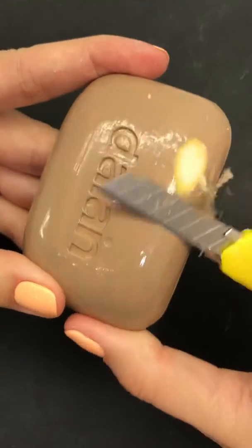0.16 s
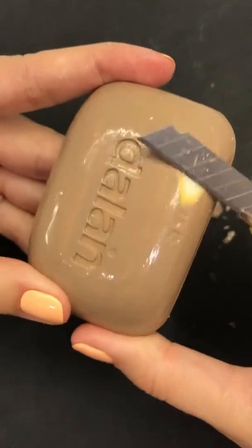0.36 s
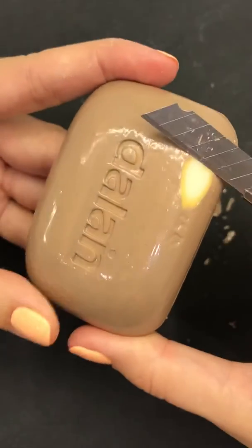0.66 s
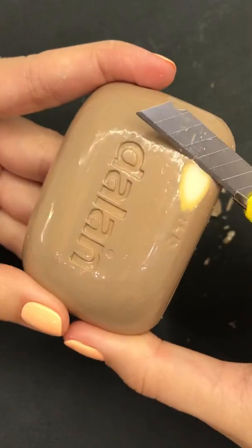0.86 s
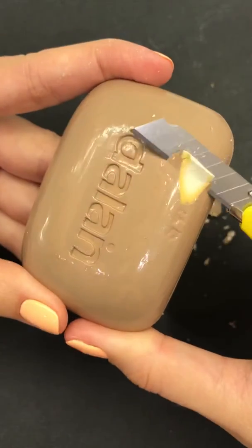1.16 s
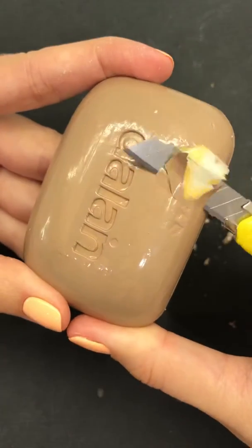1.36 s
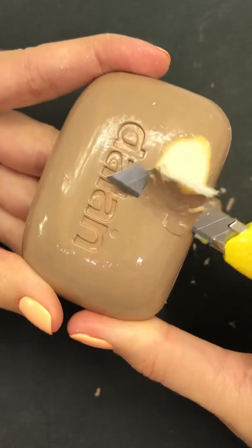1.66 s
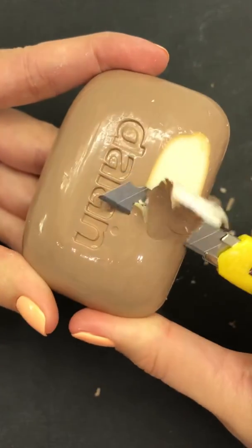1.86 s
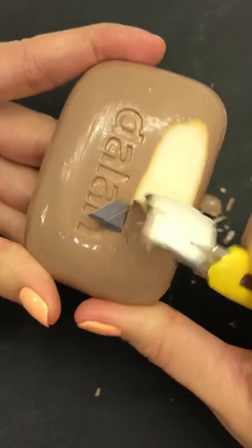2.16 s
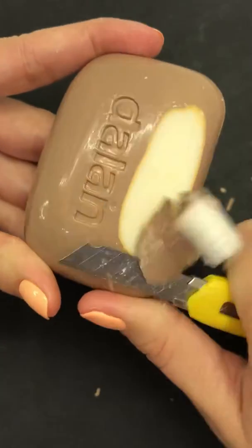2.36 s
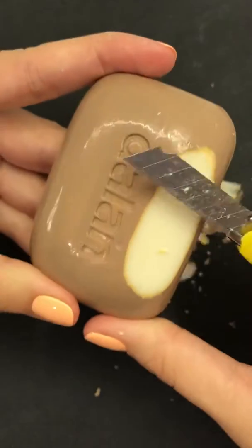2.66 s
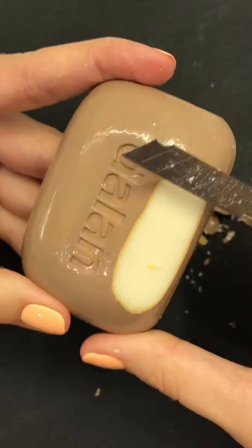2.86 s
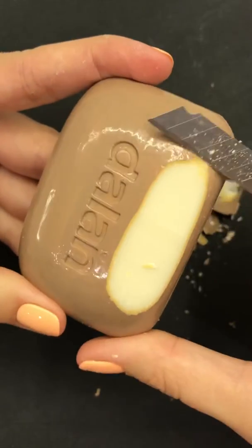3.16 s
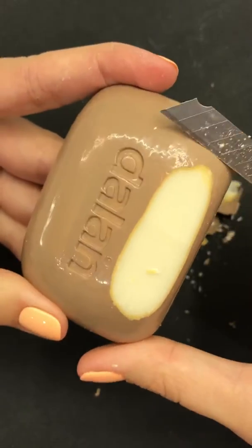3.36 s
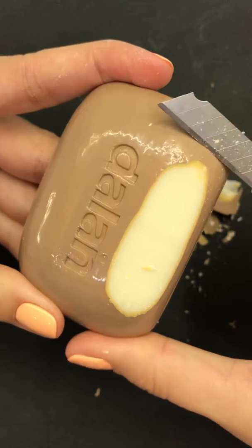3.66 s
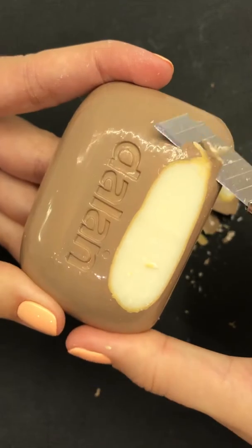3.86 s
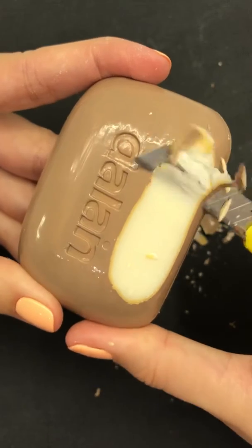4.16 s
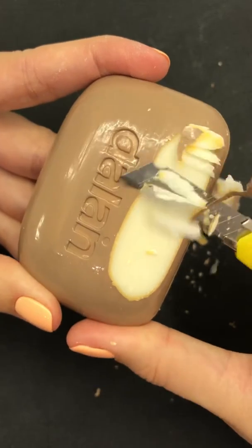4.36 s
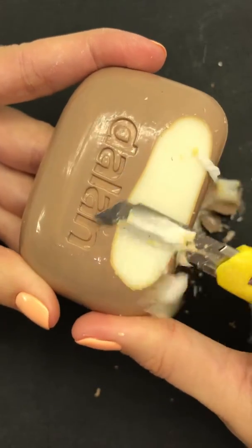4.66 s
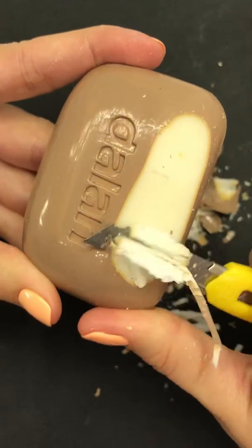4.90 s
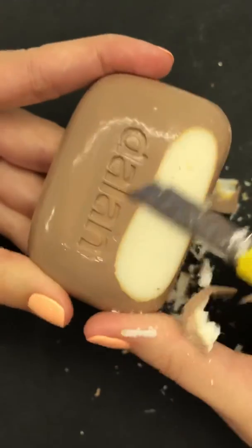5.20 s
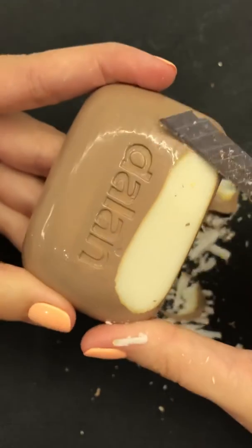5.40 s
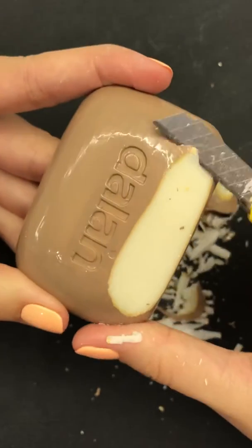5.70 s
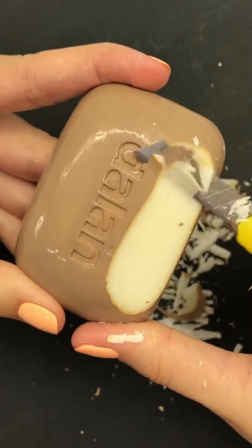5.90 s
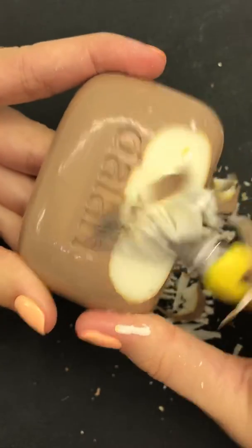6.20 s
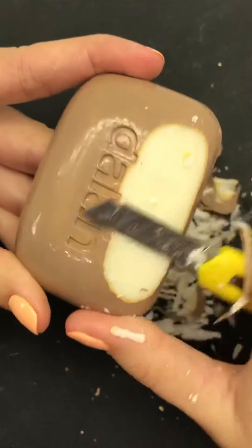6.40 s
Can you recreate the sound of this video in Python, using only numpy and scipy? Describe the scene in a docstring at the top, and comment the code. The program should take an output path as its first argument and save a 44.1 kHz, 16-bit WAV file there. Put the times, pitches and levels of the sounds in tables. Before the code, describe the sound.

Close, brittle crackling and dry scraping as a utility knife shaves coated soap in uneven strokes, with a faint steady hum behind.

```python
"""A hard, lacquered bar of soap is carved with a thin knife at a table, close to a phone's microphone.
The brittle skin snaps, the soap cracks and crumbs tick on the table, ringing bar, blade and tabletop.
Between cracks the blade scrapes through the grit, and a few soft bumps come through the table.
The room is small and answers briefly; an appliance hums in the background."""
import sys
import numpy as np
from scipy import signal
from scipy.fft import rfft, irfft, next_fast_len
from scipy.io import wavfile
from scipy.ndimage import map_coordinates

SR = 44100
rng = np.random.default_rng(int(sys.argv[2]) if len(sys.argv) > 2 else 0)


def file_out(sig):
    """Save sig as 16-bit WAV at sys.argv[1]."""
    # one column per channel
    cols = np.atleast_2d(sig).T
    # limit, then scale
    lim = np.clip(cols, -1, 1)
    pcm = np.round(lim * 32767).astype(np.int16)
    wavfile.write(sys.argv[1], SR, pcm)


N = 288414

# modes of the soap bar: f/Hz, width/Hz, level/dB
BAR_MODES = [(2734, 130, 1), (2970, 193, -1.5), (3250, 104, 3), (3595, 174, 6), (3744, 518, 1.5),
             (4177, 104, 7), (4264, 320, -0.5), (4970, 378, -0.5)]
# modes of the blade: f/Hz, width/Hz, level/dB
BLADE_MODES = [(5543, 600, 1), (5730, 413, 3.5), (6190, 640, -6.5), (6955, 500, -4), (8510, 260, -9)]
# modes of the tabletop: f/Hz, width/Hz, level/dB
TABLE_MODES = [(892, 370, -5.5), (1253, 170, 0), (1958, 160, 0), (2270, 340, -2)]
# humps of a brittle break and the blade's high modes: f/Hz, width/Hz, level/dB
SNAP_MODES = [(9600, 520, -4), (10830, 120, 0), (12800, 3000, 5.5), (12640, 360, 8.5)]


def amp(db):
    """dB to gain."""
    return 10 ** (np.asarray(db) / 20)


def unit(x):
    """x at rms 1."""
    return x / np.sqrt(np.mean(x ** 2) + 1e-20)


def along(points, hz):
    """(f/Hz, value) points interpolated on a log frequency axis."""
    f, v = np.transpose(points)
    return np.interp(np.log(hz + 1), np.log(f + 1), v)


def filtered(x, gain):
    """x times a complex gain, given as a function of frequency."""
    m = next_fast_len(N + SR // 2)
    return irfft(rfft(x, m) * gain(np.fft.rfftfreq(m, 1 / SR)), m)[..., :N]


def response(modes):
    """The summed, causal response of a set of resonances, alternating in sign."""
    return lambda f: sum((-1) ** k * amp(db) * 1j * f * width / (hz * hz - f * f + 1j * f * width)
                         for k, (hz, width, db) in enumerate(modes))


def resonate(x, modes):
    """x through a set of resonances, at rms 1."""
    return unit(filtered(x, response(modes)))


def struck(modes, lift_db):
    """Ringing after one blow, damped by the edge still in touch, each mode lifted by its own dB; peak 1."""
    damped = [(hz, 1.5 * width, db + lift) for (hz, width, db), lift in zip(modes, lift_db)]
    ring = irfft(response(damped)(np.fft.rfftfreq(2048, 1 / SR)))[:1400]
    return ring / np.abs(ring).max()


def wobble(rate):
    """A smooth random curve, rate knots a second."""
    return map_coordinates(rng.standard_normal(int(N * rate / SR) + 4), [np.arange(N) * rate / SR])


def grit(per_second, spread_db):
    """Random small breaks of scattered size, rms 1."""
    breaks = rng.random(N) < per_second / SR
    size_db = spread_db * np.minimum(rng.exponential(1, N), 4.5)
    return unit(breaks * amp(size_db) * rng.standard_normal(N))


def appliance_hum():
    """An appliance in the background: narrow bands of noise at its motor lines and the room's low modes."""
    # room resonances and motor lines: f/Hz, width/Hz, level/dB
    hum_modes = [(47.4, 15, -21.5), (63.3, 4, -18.5), (82.5, 25, -22), (98.5, 4.1, -11), (126.9, 6.7, -0.5),
                 (154.57, 3.12, 2), (167.7, 7, -7.5), (189.2, 8.2, -8.5), (201, 14, -15.5),
                 (230.1, 2.9, -9.5), (242.3, 7.3, -16), (255, 2.57, -7.5), (265.2, 5, -15.5),
                 (298, 16, -19.5), (318.6, 5.5, -15.5), (346.3, 1.8, -9), (363.4, 15, -27),
                 (411, 37, -24.5), (436, 18, -25)]
    hum = resonate(rng.standard_normal(N), hum_modes)
    return amp(-45.5) * filtered(hum, lambda hz: 1 / (1 + (hz / 450) ** 6))


def room_tone():
    """The faint, steady noise of the room's air."""
    # spectrum of the room noise: f/Hz, relative density/dB
    air_spectrum = [(260, -13.5), (450, 0), (507, -6), (947, -8), (2150, -16.5), (3360, -15), (3780, -23),
                    (4390, -15), (4870, -24.5), (6970, -23), (10400, -28.5), (14900, -25), (15800, -35.5)]
    return amp(-66.5) * unit(filtered(rng.standard_normal(N), lambda hz: amp(along(air_spectrum, hz))))


def room_echo(x):
    """A scattered echo off table and hands, then the small room's tail; drawn anew every tenth second."""
    # decay of the room: f/Hz, T60/s
    decay_times = [(800, 0.43), (3300, 0.41), (8000, 0.45), (15000, 0.39)]
    out = np.zeros(N + SR)
    hop, delay = SR // 10, 190  # samples
    for start in range(0, N, hop):
        hz, t, noise = signal.stft(rng.standard_normal(SR // 2), SR, nperseg=256)
        decay = amp(-60 * t / along(decay_times, hz)[:, None])
        tail = signal.istft(noise * decay, SR, nperseg=256)[1]
        near = rng.standard_normal(len(tail)) * np.exp(-np.arange(len(tail)) / SR / 0.00057)
        answer = amp(-19.0) * tail / np.linalg.norm(tail) + amp(-9.5) * near / np.linalg.norm(near)
        wet = signal.fftconvolve(x[start:start + hop], answer)
        out[start + delay:][:len(wet)] += wet
    return out[:N]


def table_bumps():
    """Low thuds reach the microphone through the table, each a soft swell of a few cycles."""
    # bumps: t/s, envelope peak/dB, f/Hz
    bumps = [(.17, -52.5, 45), (1.82, -52, 60), (2.39, -48.5, 49.6), (4.752, -50, 61.7), (5.1, -52, 44.8),
             (6.273, -47, 61)]
    t = np.arange(N) / SR
    return sum(amp(db) * np.exp(-((t - s) / 0.039) ** 2) * np.sin(2 * np.pi * hz * (t - s))
               for s, db, hz in bumps)


def blade_scrape():
    """The edge ploughs grit in clumps: coarse grains ring bar, blade and table, finer ones hiss."""
    # scrape of the blade in the soap: t/s, level/dB
    stroke = [(0.059, -77), (0.084, -48), (0.144, -46), (0.214, -67.5), (0.403, -51.5), (0.555, -66),
              (0.57, -75), (0.693, -94.5), (0.949, -91.5), (0.984, -75), (1.279, -68.5), (1.369, -90),
              (1.398, -64), (1.811, -63), (2.163, -68), (2.35, -65.5), (2.546, -53), (2.764, -61.5),
              (2.883, -67.5), (3.03, -92.5), (3.058, -66.5), (3.312, -71.5), (3.411, -85), (3.812, -84.5),
              (3.839, -61), (3.979, -66.5), (4.213, -59.5), (4.295, -61), (4.32, -73), (4.45, -69),
              (4.515, -58.5), (4.628, -65.5), (4.868, -55.5), (4.997, -63.5), (5.066, -51.5),
              (5.161, -62.5), (5.2, -41), (5.264, -49.5), (5.365, -40.5), (5.405, -52.5), (5.53, -60),
              (5.638, -93), (5.679, -56), (5.72, -63.5), (6.05, -60.5), (6.171, -57), (6.239, -42),
              (6.31, -60.5), (6.416, -46.5), (6.539, -53.5)]
    # brightness of the scrape: t/s, hiss lift/dB
    brightness = [(0.3, 1.5), (0.9, 2), (1.2, 2), (2.2, 5), (2.6, 0), (3.1, -3), (4.0, 4.5), (4.4, 1),
                  (4.9, 1), (5.1, 5.5), (5.45, -2.5), (6.1, 3.5), (6.5, -2)]
    t = np.arange(N) / SR
    scrape_db = np.interp(t, *np.transpose(stroke))
    # a louder scrape hisses more and comes in deeper clumps
    hiss_db = -63.5 + 0.83 * (scrape_db + 57.5) + np.interp(t, *np.transpose(brightness))
    clump_db = np.clip(2 + 0.071 * (scrape_db + 57), 0, 4)
    clumps = amp(clump_db * (wobble(60) + wobble(150)))
    coarse = clumps * grit(per_second=2500, spread_db=1.0)
    fine = clumps * grit(per_second=6000, spread_db=2.5)
    body = unit(resonate(coarse, BAR_MODES)
                + amp(-5.0) * resonate(coarse, BLADE_MODES)
                + amp(-10.5) * resonate(coarse, TABLE_MODES))
    hiss = filtered(resonate(fine, SNAP_MODES), lambda hz: 1 / (1 + (hz / 15000) ** 4))
    return amp(scrape_db) * body + amp(hiss_db) * hiss


def soap_cracks():
    """Each crack is a sharp break in a spray of crumbs, driving four voices: bar, blade, snap and table."""
    # cracks and ticks: t/s, ring centre/Hz, bar peak/dB, snap peak/dB, table peak/dB, crumbs re break/dB
    cracks = [(0.0694, 2480, -16.5, -20, -33, -11), (0.089, 3340, -30, -38, -56, -15.5),
              (0.1065, 3200, -43, -35, -52, -18.5), (0.1189, 4030, -34, -28, -56, -24),
              (0.1284, 3180, -36, -50.5, -45, 2), (0.1419, 2900, -26, -44, -48, -0.5),
              (0.1516, 2800, -18.5, -32.5, -37, -11.5), (0.2452, 4290, -40, -38, -61, -23),
              (0.2968, 3460, -29.5, -38, -57, -16), (0.3058, 3230, -36, -44.5, -63, -20),
              (0.3338, 4120, -38, -57, -66, -17.5), (0.3446, 3130, -25, -31.5, -56, -19),
              (0.359, 3270, -42.5, -64.5, -63, -20), (0.3734, 3120, -52, -49.5, -65, -26),
              (0.3852, 3320, -8, -30.5, -37, -22), (0.4152, 3350, -30.5, -34, -61, -23.5),
              (0.598, 3260, -66, -59, -68, -18), (0.7006, 4370, -60.5, -50, -66, -22),
              (0.753, 3220, -59, -53, -70, -19), (0.8473, 3070, -48.5, -57.5, -70, -12),
              (0.9622, 3140, -27.5, -37.5, -42, -12.5), (0.9962, 4340, -38, -43, -58, -8.5),
              (1.0748, 3330, -43.5, -39, -66, -21.5), (1.0975, 3260, -60, -55.5, -68, -8),
              (1.129, 4660, -40.5, -41, -64, -18), (1.1479, 3260, -56, -56, -68, -13),
              (1.1688, 2690, -62, -45.5, -67, -28), (1.2003, 2710, -44.5, -49, -65, -13),
              (1.272, 5120, -61, -40.5, -70, -24), (1.2813, 4460, -46.5, -34, -68, -29),
              (1.3308, 3220, -58, -45, -71, -32), (1.3777, 4230, -35, -18, -56, -24),
              (1.405, 3310, -48, -24, -65, -31.5), (1.4345, 3310, -48, -38, -67, -21),
              (1.4872, 4530, -47, -17, -62, -33), (1.4956, 3230, -43, -34, -62, -23.5),
              (1.5089, 3250, -57, -35, -62, -32), (1.5528, 4220, -43, -17.5, -64, -33),
              (1.5743, 4400, -45, -31.5, -64, -21), (1.592, 3030, -33, -51, -37, -18.5),
              (1.6036, 3260, -42, -52, -53, -7), (1.6376, 4430, -50, -24, -66, -36),
              (1.6642, 4500, -49, -25.5, -64, -28), (1.7395, 5300, -45, -22, -65, -32.5),
              (1.7787, 3980, -36, -28.5, -54, -16), (1.8121, 3260, -55, -34.5, -66, -15),
              (1.8261, 4100, -51, -36, -59, -27), (1.9136, 4090, -57, -42, -59, -20.5),
              (1.996, 4640, -46, -39.5, -59, -6), (2.0446, 4230, -57, -22, -64, -31),
              (2.0626, 4660, -60, -31, -68, -30), (2.1124, 3390, -61, -39.5, -64, -24),
              (2.1412, 3270, -57, -37, -69, -25), (2.168, 4600, -55, -29, -66, -29.5),
              (2.2435, 4000, -40, -12, -50, -29.5), (2.276, 4570, -43, -54, -54, -5),
              (2.3084, 4460, -44.5, -28, -67, -22.5), (2.3606, 3980, -23.5, -21.5, -36, -16.5),
              (2.37, 2920, -30.5, -58, -41.5, -13), (2.3928, 5000, -32, -33.5, -46, -26),
              (2.4929, 2730, -30.5, -26.5, -46, -19.5), (2.5176, 3290, -37, -33.5, -56, -20.5),
              (2.545, 4110, -30.5, -24.5, -47, -11.5), (2.5547, 3560, -36, -36.5, -55, -25),
              (2.5808, 3470, -15.5, -30, -47, -18.5), (2.6005, 3400, -17.5, -25, -34, -18),
              (2.6287, 3610, -34, -56, -51, -20), (2.68, 3380, -43, -45, -54, -8),
              (2.731, 3510, -40, -53, -65, -19.5), (2.7427, 3800, -38, -49, -63, -25),
              (2.7798, 3350, -17, -33.5, -38.5, -13), (3.0432, 4460, -32, -35.5, -58, -8.5),
              (3.055, 4290, -36, -33, -44, -10.5), (3.154, 4400, -40.5, -38, -60, -13.5),
              (3.1879, 3970, -37, -38.5, -51, -10), (3.228, 3100, -51.5, -61, -56, -9),
              (3.3087, 3210, -55, -57, -69, -6), (3.8153, 3210, -47, -41, -68, -21),
              (3.828, 2980, -14, -23, -34, -12.5), (3.8669, 3100, -37, -51, -47, -8),
              (3.904, 2790, -44, -25.5, -67, -31), (4.024, 3300, -54, -50, -64, -15),
              (4.171, 3160, -44, -64, -60, -9), (4.3314, 3170, -49.5, -53, -69, -12),
              (4.381, 3170, -46, -67, -69, -18), (4.3963, 3340, -37, -51, -65, -19),
              (4.4213, 3260, -50.5, -50, -70, -5), (4.4594, 3350, -43, -57, -64, -15),
              (4.4992, 3500, -36.5, -31.5, -62, -20.5), (4.558, 4780, -46, -49, -63, -13),
              (4.612, 3340, -29, -25.5, -41, -17), (4.6951, 3340, -38.5, -33.5, -61, -27),
              (4.7242, 3740, -47, -39, -66, -20), (4.74, 3290, -44, -59, -60, -16),
              (4.8057, 3490, -42, -44, -65, -18.5), (4.8255, 3440, -24.5, -33, -38.5, -33.5),
              (4.8512, 3480, -27, -30.5, -37.5, -8), (4.866, 3330, -31, -51, -45, -23),
              (4.876, 3340, -31, -39, -37.5, -13), (4.906, 3370, -30, -41.5, -64, -21),
              (4.9175, 3550, -40, -31, -56, -24), (4.939, 3150, -48, -34, -65, -19),
              (4.9687, 3420, -30, -54, -49, -20), (5.0124, 3380, -54, -36.5, -60, -21.5),
              (5.0232, 4340, -51, -30, -63, -30.5), (5.064, 3730, -37, -25.5, -44, 4),
              (5.069, 5160, -11.5, -40, -28.5, -22.5), (5.1091, 3820, -52, -36.5, -61, -23),
              (5.1675, 3590, -40, -54, -52, -17), (5.1869, 3600, -20, -27, -35.5, -18.5),
              (5.1958, 3400, -23, -25, -50, -25.5), (5.208, 3300, -27.5, -42, -44, -18),
              (5.2324, 3320, -20.5, -48, -51, -14), (5.247, 4180, -31, -48, -59, -15),
              (5.2762, 3380, -29, -46.5, -53, -12), (5.2862, 3440, -35, -32, -60, -8.5),
              (5.306, 3770, -23, -29, -52, -11), (5.3218, 3600, -25.5, -38, -54, -9),
              (5.3392, 3470, -18.5, -27.5, -45, -21.5), (5.357, 3240, -22, -33, -46, -10.5),
              (5.3763, 3200, -20.5, -30, -43, -13), (5.431, 3000, -34, -33.5, -63, -15),
              (5.4857, 4030, -49, -61, -68, -9), (5.5686, 4530, -44.5, -49, -65, -19),
              (5.612, 2890, -39, -53, -66, -13), (5.66, 2690, -35, -38.5, -49, -10),
              (5.675, 3170, -33.5, -43, -54, -15), (5.6957, 2690, -41, -50, -62, -13),
              (5.7207, 3150, -29.5, -26.5, -46, -12), (5.7531, 3230, -43, -50, -58, -10),
              (5.868, 3120, -40, -40, -68, -17.5), (5.8798, 4120, -40.5, -47, -66, -12),
              (5.9, 4150, -40, -42, -66, -27), (6.0181, 4110, -43, -43.5, -66, -17),
              (6.0975, 5060, -25.5, -23.5, -58, -29), (6.1206, 3330, -36.5, -34, -59, -19),
              (6.146, 3150, -43, -37, -62, -25.5), (6.184, 3180, -40, -42.5, -63, -18),
              (6.2045, 3150, -43, -49, -55, -23), (6.222, 3250, -34, -47, -47, -11),
              (6.2468, 3540, -30, -47.5, -50, -9), (6.325, 3360, -37, -56, -62, -24),
              (6.369, 3280, -31, -63, -48, -17), (6.3949, 2870, -15.5, -14, -34, -21),
              (6.4223, 3300, -20, -23.5, -43, -16), (6.4514, 3770, -25, -41.5, -47, -14.5),
              (6.4664, 4400, -31, -37.5, -48, -13), (6.4998, 3500, -22.5, -35, -52, -16),
              (6.5213, 3650, -26, -32, -54, -29.5), (6.5376, 4960, -26, -14, -47, -35)]
    out = np.zeros(N + SR)
    lead = 150  # samples of crumbs ahead of the break
    t = (np.arange(SR // 10) - lead) / SR
    bar_hz = np.transpose(BAR_MODES)[0]
    for s, centre_hz, bar_db, snap_db, table_db, crumbs_db in cracks:
        crumble_s = 0.0073 * amp(0.13 * (crumbs_db + 8))  # a crumbly break also lasts longer
        swell = np.where(t < 0, amp(1.5) * np.exp(t / 0.0023), np.exp(-t / crumble_s))
        crumbs = amp(crumbs_db + np.array([[-8], [-4], [3], [-6]])) * swell  # one row a voice
        force = crumbs * (rng.random(len(t)) < .25) * rng.standard_normal((4, len(t)))
        force[:, lead] = 1  # the break itself
        # the place of the break favours the bar's modes nearest the ring centre
        near_db = -12 * (1 - np.exp(-((bar_hz - centre_hz) / 450) ** 2))
        chance_db = 4 * rng.standard_normal((3, len(BLADE_MODES)))
        rings = [struck(BAR_MODES, near_db), struck(BLADE_MODES, chance_db[0]),
                 struck(SNAP_MODES, chance_db[1]), struck(TABLE_MODES, chance_db[2])]
        voices = signal.fftconvolve(force, rings, axes=1)
        blade_db = bar_db + 0.36 * (snap_db - bar_db) - 1.5  # just under a blend of bar and snap
        gains = amp([bar_db, blade_db, snap_db, table_db]) / np.abs(voices).max(axis=1)
        crack = gains @ voices
        out[round(s * SR) - lead:][:len(crack)] += crack
    return out[:N]


def scene():
    """Knife and soap close to the microphone, the small room behind them; mono."""
    carving = soap_cracks() + blade_scrape()
    return (carving + room_echo(carving) + table_bumps() + appliance_hum() + room_tone())[None]


def record(dry):
    """The phone rolls off the deepest bass and keeps nothing above its band limit."""
    low_cut_hz, top_hz = 33, 15900
    return filtered(dry, lambda hz: (hz < top_hz) / (1 + (low_cut_hz / (hz + 1)) ** 4))


dry = scene()
out = record(dry)
file_out(out)
```